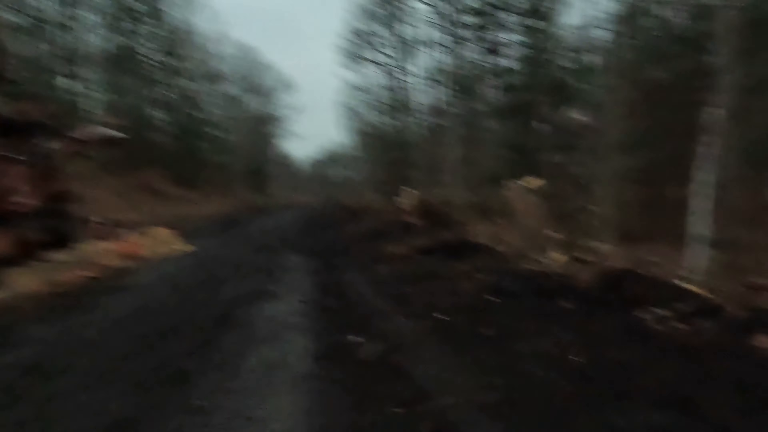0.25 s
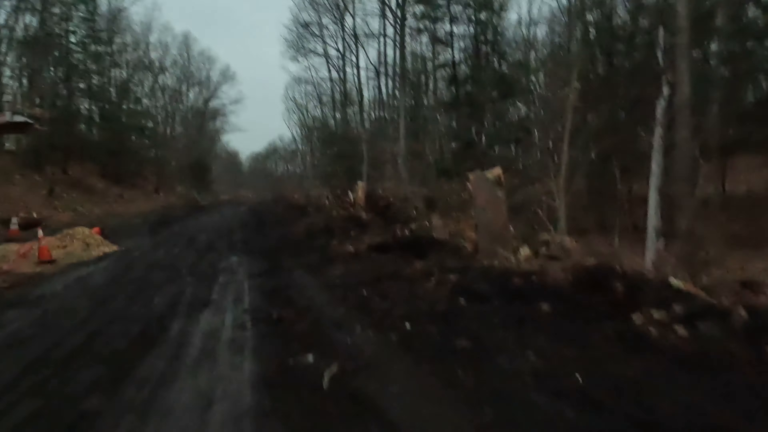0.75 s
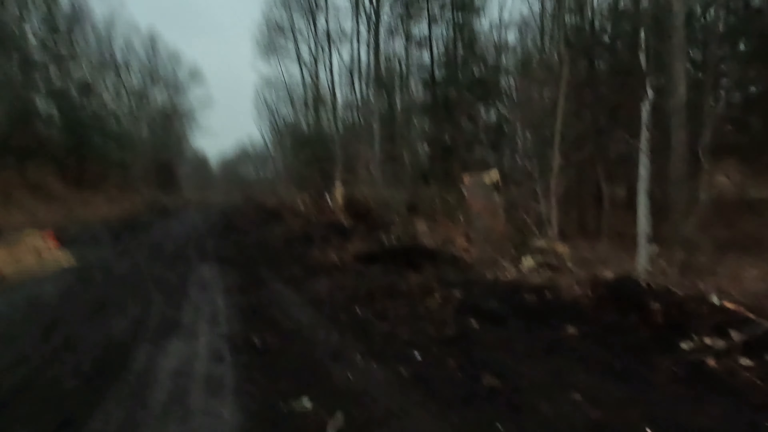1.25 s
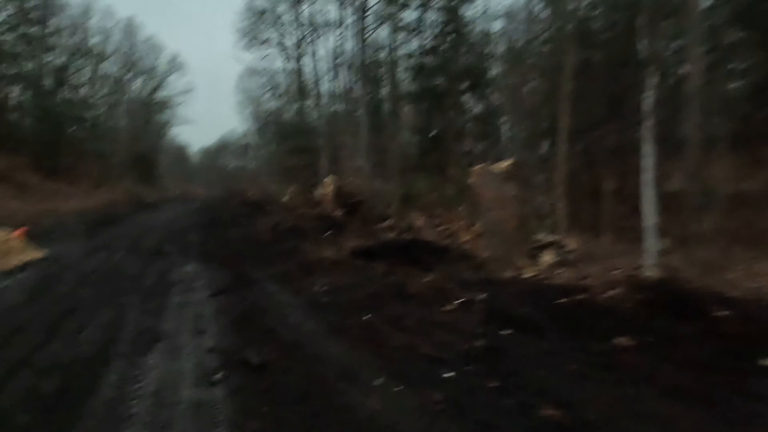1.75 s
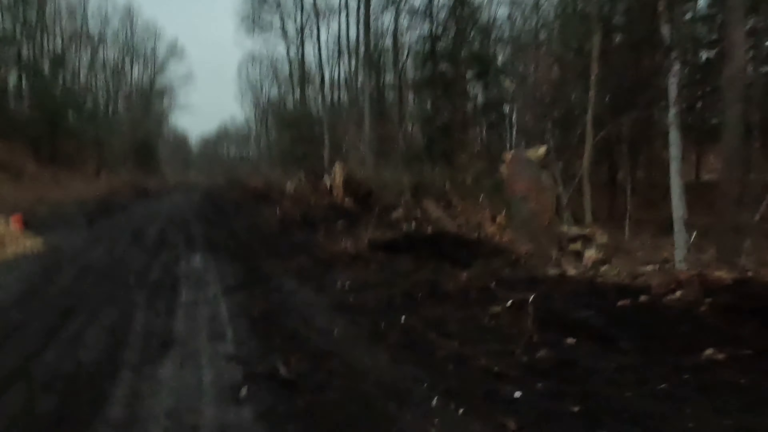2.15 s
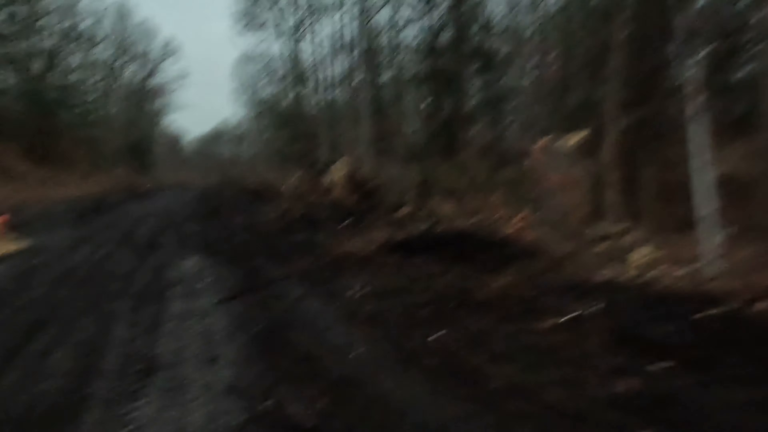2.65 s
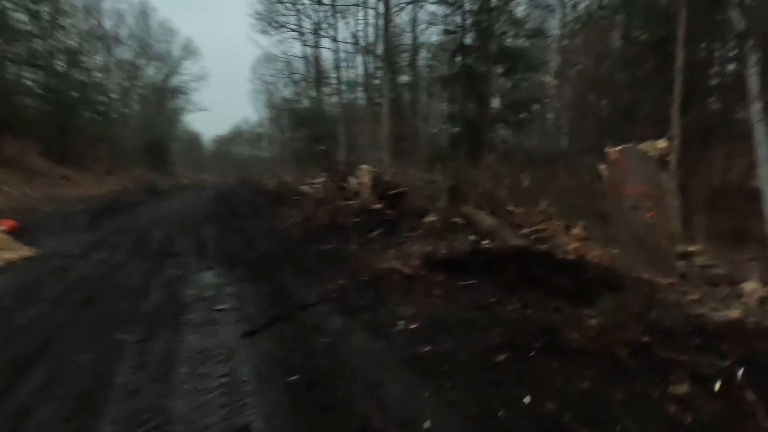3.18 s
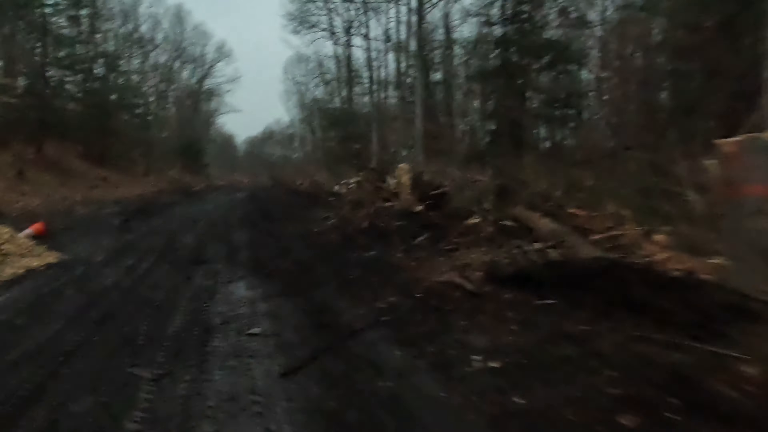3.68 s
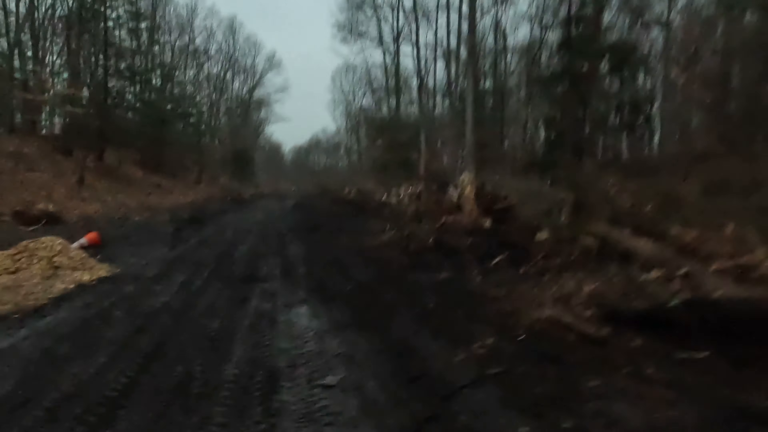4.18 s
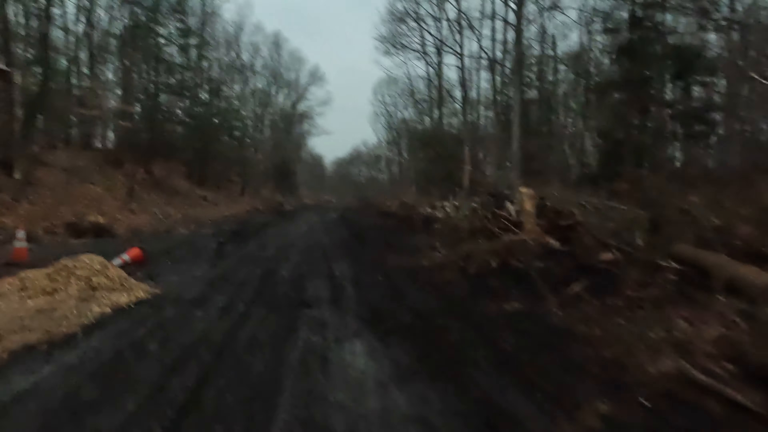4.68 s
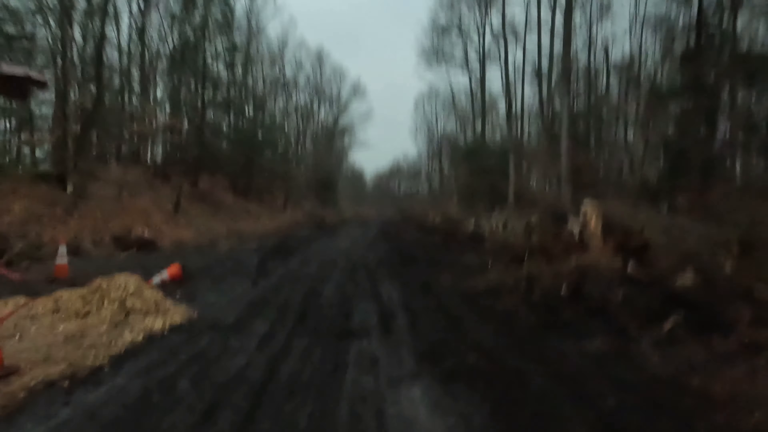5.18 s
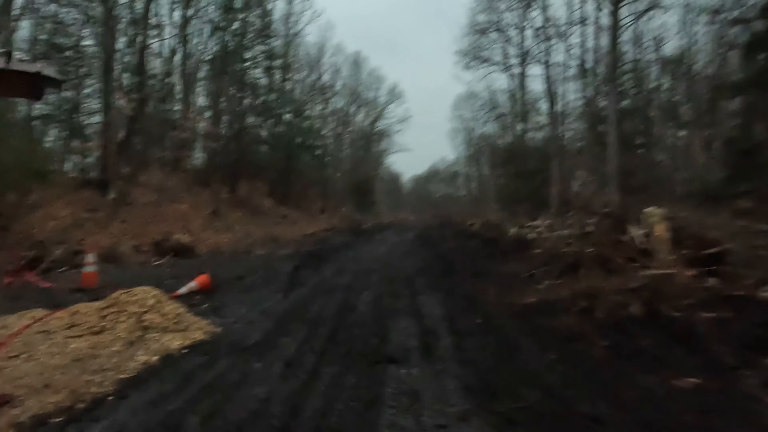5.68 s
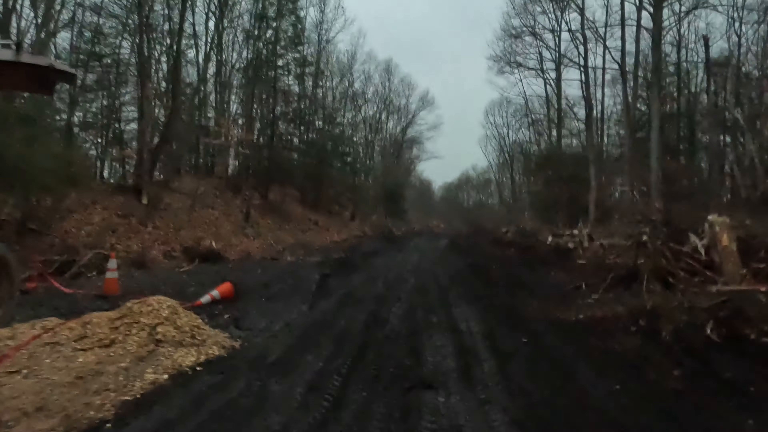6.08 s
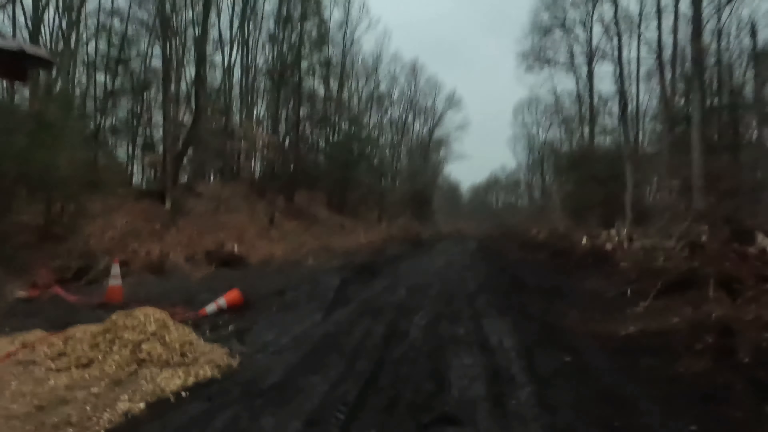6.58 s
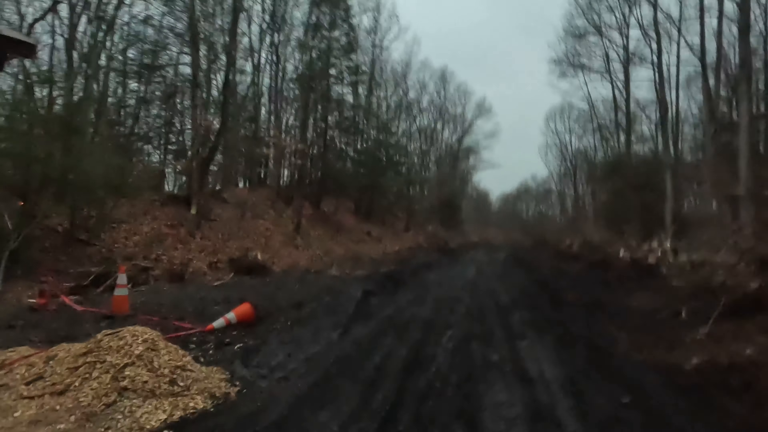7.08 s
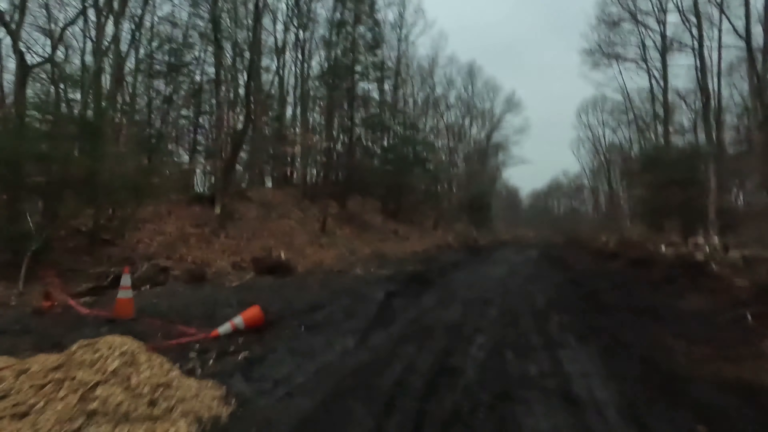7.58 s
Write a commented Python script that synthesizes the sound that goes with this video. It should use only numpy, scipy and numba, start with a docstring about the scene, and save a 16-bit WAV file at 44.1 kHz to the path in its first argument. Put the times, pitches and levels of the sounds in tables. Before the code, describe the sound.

Wet mud underfoot: dull heel thuds, sticky bubbles and small plops, clearest at first, gentler in the middle, strong again near six seconds and bubbly at the end. Wind buffets the handheld microphone in deep gusts, and light rain hisses steadily with bright clicks of drops and grit. A dull wash in the branches fades early. Two bumps jolt the camera late on.

```python
"""A muddy forest track on a wet, windy day, heard from a small camera carried by a walker.
Wind is filtered noise with wandering levels: a rumble and a choppier flutter on the microphone ports.
Drizzle is a noise hiss with sparse clicks; nearer drops and grit are short decaying sine rings.
Boots thud and squelch about twice a second: damped low rings, swarms of bubbles and popping air pockets.
A jet of water whistles in spurts, and twice a knock sets off damped modes of the camera body and hand."""
import sys
import numpy as np
from scipy import signal
from scipy.fft import rfft, irfft, next_fast_len
from scipy.io import wavfile
from scipy.ndimage import uniform_filter1d
from numba import njit

SR = 44100
rng = np.random.default_rng(int(sys.argv[2]) if len(sys.argv) > 2 else 0)


def inscribe(sig):
    """Save sig as 16-bit PCM at rate SR to the path in sys.argv[1].

    A 1-D sig is mono; a 2-D sig holds one channel per row.
    Samples are clipped to [-1, 1] before scaling.
    """
    pcm = np.round(np.clip(np.atleast_2d(sig).T, -1, 1) * 32767)
    wavfile.write(sys.argv[1], SR, pcm.astype(np.int16))


N = 345679
SIZE = next_fast_len(N)  # transform length


def undb(db):
    """Amplitude gain is ten to the power of decibels over twenty."""
    return 10 ** (np.asarray(db) / 20)


def level(x, db):
    """Scale to an rms level, the root of the mean power."""
    return x * undb(db) / np.sqrt(np.mean(x ** 2))


def curves(rows):
    """Linear interpolation turns the columns of a timed table into slow control signals."""
    s, *columns = np.transpose(rows)
    return [np.interp(np.arange(N) / SR, s, column) for column in columns]


def over_hz(points):
    """Read a table of (freq_hz, value) at every frequency bin, interpolating over log frequency."""
    hz, value = np.transpose(points)
    bins_hz = np.fft.rfftfreq(SIZE, 1 / SR)
    return np.interp(np.log(bins_hz + 1), np.log(hz), value)


def colour(x, points):
    """Spectral shaping: multiply the spectrum by a gain curve, then set the rms to 1."""
    spectrum = rfft(x, SIZE) * undb(over_hz(points))
    return level(irfft(spectrum, SIZE)[..., :N], 0)


def walk(rate):
    """Slow random modulation: values held 1 / rate s, smoothed by two moving averages; rms 1."""
    k = int(SR / rate)
    held = np.repeat(rng.standard_normal(N // 100)[:N // k + 1], k)
    smooth = uniform_filter1d(uniform_filter1d(held, k), k)
    return level(smooth[:N], 0)


def pair(likeness):
    """Partial coherence: left and right noise with this correlation, built from mid and side."""
    mid, side = rng.standard_normal((2, N))
    share = np.clip(likeness, 0, 1)
    return np.sqrt(1 + share) * mid + np.sqrt(1 - share) * side * np.array([[1], [-1]])


@njit
def grains(n, rows, glide, rise):
    """Damped oscillators: rows (start, turns a sample, fade in cycles, left, right) swell, glide and die."""
    out = np.zeros((2, n))
    for start, turns, fade, left, right in rows:
        phase, i = 0., int(start)
        while phase < 6 * fade and i < n:
            v = np.sin(2 * np.pi * phase) * np.exp(-phase / fade) * min(phase / rise, 1.)
            out[0, i] += left * v
            out[1, i] += right * v
            phase += min(turns * (1 + glide * phase / fade), .45)
            i += 1
    return out


def ring(s, db, hz, pan_db, cycles, glide, rise=0.11):
    """Impulsively excited resonances: db sets the crest, pan_db is left minus right, rise is in cycles."""
    fade = np.maximum(cycles, .3) / 2  # cycles in which the amplitude falls by a factor e
    crest = np.exp(-rise / fade)  # what the decay leaves once the swell is complete
    left = undb(db + pan_db / 2) / crest
    right = undb(db - pan_db / 2) / crest
    rows = np.array(np.broadcast_arrays(s * SR, hz / SR, fade, left, right))
    return grains(N, np.ascontiguousarray(rows.T), glide, rise)


def wash():
    """Band-limited noise, perhaps wind in the branches: a dull wash that holds, then fades out."""
    # dull noise spectrum: freq_hz, density_db (per Hz)
    wash_spectrum = [(300, -30), (500, 2.5), (750, 0), (1100, 4), (2500, -38)]
    fade_at_s, fade_length_s, wash_db = 1.5, 0.24, -58  # level before the fade
    fade = 1 / (1 + np.exp((np.arange(N) / SR - fade_at_s) / fade_length_s))
    gusty = colour(pair(0.53), wash_spectrum) * undb(4.1 * walk(10.67))
    return level(gusty, wash_db) * fade


def wind():
    """Turbulent pressure at the ports: slow rumble and choppier flutter, both swelling at footfalls."""
    # wind on the ports, before the footfall swell: time_s, rumble_db, flutter_db
    wind_levels = [(0.0, -41, -53.5), (1.07, -41, -52.5), (1.55, -43.5, -55), (1.79, -40, -48.5),
                   (2.82, -39.5, -50.5), (4.08, -42, -54.5), (4.25, -40.5, -50), (5.13, -46, -54),
                   (5.63, -39, -50.5), (6.05, -43.5, -57.5), (6.2, -43.5, -51), (7.42, -44, -49),
                   (7.53, -37.5, -47.5), (7.84, -46, -48.5)]
    # noise spectra of the rumble and the flutter: freq_hz, density_db (per Hz)
    rumble_spectrum = [(12, -4), (28, 2), (45, -2.5), (65, 0), (110, -10), (160, -20.5), (300, -79)]
    flutter_spectrum = [(60, -7), (130, -3), (200, -3), (350, -11.5), (600, -23.5), (1000, -57)]
    # footfalls that swing the camera through the air: time_s, rumble_swell_db
    steps = [(0.22, 8), (0.73, 2), (1.18, 4.5), (1.7, 4), (2.25, 4), (2.7, 1.5), (3.23, 4), (3.7, 5.5),
             (4.22, 2), (4.78, 6.5), (5.15, 6.5), (6.16, 5.5), (6.63, 5)]
    swing_rise_s, swing_fall_s = 0.063, 0.097
    flutter_share = 0.5  # the flutter swells by this share of the dB
    rumble_db, flutter_db = curves(wind_levels)
    t = np.arange(N) / SR
    swing_db = 0
    for s, swell_db in steps:
        width_s = np.where(t < s, swing_rise_s, swing_fall_s)
        swing_db = swing_db + swell_db * np.exp(-((t - s) / width_s) ** 2)
    rumble = level(colour(pair(0.947), rumble_spectrum) * undb(1.5 * walk(8)), 0)
    flutter = level(colour(pair(0.97), flutter_spectrum) * undb(2.3 * walk(25)), 0)
    return undb(rumble_db + swing_db) * rumble + undb(flutter_db + flutter_share * swing_db) * flutter


def drizzle(count=9000):
    """Many random impacts merge into a hiss; stronger ones are faint clicks; octaves waver separately."""
    # drizzle on leaves and ground: freq_hz, density_db (per Hz)
    drizzle_spectrum = [(180, -3), (300, -8.5), (391, -5.5), (562, -9), (821, -9.5), (1020, -4.5),
                        (1300, -2.5), (5570, -5.5), (7500, -11), (8700, -22.5), (10300, -17), (12500, -22),
                        (14000, -28), (15500, -83)]
    # coherence of the two ports: freq_hz, left_right_correlation
    likeness = [(300, 0.65), (800, 0.68), (2400, 0.65), (5000, 0.64), (9000, 0.48), (12000, 0.013)]
    # level difference of the ports: freq_hz, left_minus_right_db
    balance = [(300, -1), (700, 4.5), (1300, 1.5), (2400, 2), (4400, -1), (8100, 1.5), (12000, 3)]
    # phase difference of the ports: freq_hz, left_lead_rad
    lead = [(500, -0.76), (3100, -0.51), (5800, -0.85), (15000, 0.61)]
    drizzle_db = -48
    noise = rng.standard_normal((3, N))
    when, rarity, sign = rng.random((count, 3)).T
    near = np.zeros(N)
    near[(when * N).astype(int)] = undb(-2.6 * np.log(rarity + 0.0033)) * np.sign(sign - .5)
    noise[0] += level(np.diff(near, prepend=0), 1.0)  # differencing: small drops are bright
    both, left, right = rfft(noise, SIZE) * undb(over_hz(drizzle_spectrum))
    shared = np.clip(over_hz(likeness), 0, 1)
    ports = np.sqrt(shared) * both + np.sqrt(1 - shared) * np.array([left, right])
    tilt = undb(over_hz(balance) / 2) * np.exp(.5j * over_hz(lead))  # the ports face different ways
    ports = ports * np.array([tilt, 1 / tilt])
    octave = np.log2(np.fft.rfftfreq(SIZE, 1 / SR) / 250 + 1e-9)  # octaves above 250 Hz
    out, swell_db = 0, 0.058 * walk(6.2)
    for k in range(8):
        band = np.cos(np.pi / 2 * np.clip(octave - k, -1, 1)) ** 2
        waver_db = (0.99 + 0.0082 * k) * walk(24)  # each octave wavers separately by about 1 dB
        out = out + irfft(ports * band, SIZE)[:, :N] * undb(swell_db + waver_db)
    return level(out, drizzle_db)


def patter(count=55):
    """Random impacts: fainter drops and grit fall as short bright rings all along."""
    faint_edge_db = -42  # crest of the weakest
    s, sharp, bright, side = rng.random((count, 4)).T
    hz = 6000 * 2 ** (0.9 * bright)
    pan_db = 4.0 + 8.8 * (side - .5)
    return ring(s * N / SR, faint_edge_db + 7.3 * sharp, hz, pan_db, 2.5, glide=0., rise=0.3)


def ticks():
    """Impact excitation: each near drop or bit of grit gives a sharp edge and a slower-swelling ring."""
    # near drops and grit: start_s, ring_peak_db, ring_hz, edge_peak_db
    tick_rows = [(0.091, -30.5, 4720, -52), (0.625, -35, 4840, -34), (0.672, -35, 4350, -35),
                 (1.0122, -33, 2440, -50), (1.0154, -28, 5360, -50), (1.0765, -34, 5600, -44),
                 (1.1378, -38, 3460, -39), (1.1667, -35, 5180, -45), (1.2097, -35, 5020, -32),
                 (1.2795, -44, 3870, -46), (2.2584, -32, 4080, -42), (2.6815, -33.5, 4470, -49),
                 (3.237, -34, 4500, -42), (3.3548, -31.5, 5200, -33), (3.412, -36, 3200, -36),
                 (3.4912, -30, 6000, -50), (3.7752, -31, 4800, -48), (4.1021, -41, 3880, -46),
                 (4.1445, -33, 4630, -45), (4.2388, -37, 4200, -42), (4.584, -37, 4180, -40),
                 (5.3595, -40, 3800, -42), (5.3924, -33, 4020, -48), (5.7429, -32, 4800, -33),
                 (5.8784, -42, 3000, -49), (6.5725, -29, 5040, -37), (6.782, -37, 3240, -40),
                 (7.1447, -35, 3000, -44)]
    s, db, hz, edge_db = np.transpose(tick_rows)
    edge = ring(s, edge_db, 9500, 3.2, 3.7, glide=0.)
    body = ring(s, db, hz, 1.0, 6.3, glide=0.042, rise=0.58)
    return body - edge  # they push opposite ways, so the band between them fills


def knocks():
    """Modal response to a blow: a tap felt by the capsules, a rattle on the right, body and hand heave."""
    # knocks on the camera body: start_s, tap_left_db, tap_right_db, heave_db, rattle_db
    knock_rows = [(5.5462, -13.5, -27, -9.5, -25), (6.3013, -22, -15, -31, -48)]
    # modes of housing and hand, relative to heave_db: freq_hz, left_db, right_db, t60_s, signed_direction
    modes = [(8.9, -30, -12, 0.6, -0.72), (23.8, -9, -11, 0.3, 0.88), (38, -23, -4, 0.15, 0.69),
             (79, 1.5, -9, 0.07, 0.89), (143, -14, -8, 0.07, 0.79)]
    # rattle grains, relative to rattle_db: after_tap_s, freq_hz, peak_db
    rattle = [(-.003, 1250, -6), (-.0025, 6400, -4), (0., 1150, -2), (0., 3130, 2), (.01, 1050, -8)]
    # delay of the heave, left then right, as the blow lands nearer the right capsule: lag_s
    heave_lag = [
        [0.003],
        [0.0016],
    ]
    tap_hz, tap_t60_s = 146, 0.012
    out, t = np.zeros((2, N)), np.arange(SR // 2) / SR
    tap = -np.sin(2 * np.pi * tap_hz * t) * undb(-60 * t / tap_t60_s) * np.clip(t / 0.0015, 0, 1)
    late = np.maximum(t - np.array(heave_lag), 0)
    heave = 0
    for hz, left_db, right_db, t60_s, way in modes:
        decay = undb(-60 * late / t60_s)
        heave = heave + way * undb([[left_db], [right_db]]) * np.sin(2 * np.pi * hz * late) * decay
    after, hz, db = np.transpose(rattle)
    for s, left_db, right_db, heave_db, rattle_db in knock_rows:
        i = int(s * SR)
        out[:, i:i + len(t)] += undb([[left_db], [right_db]]) * tap + undb(heave_db) * heave
        out += ring(s + after, db + rattle_db, hz, -10.0, 2.0, glide=0., rise=0.18)
    return out


def squirt():
    """Jet tone: water squeezed out whistles in spurts that swell for a few cycles and ring at its pitch."""
    # spurts of the jet: start_s, peak_db, pitch_hz
    spurts = [(5.0958, -39, 5300), (5.105, -39, 5700), (5.1115, -30, 6000), (5.1145, -30, 5700),
              (5.1135, -37, 3900), (5.12, -35, 5950), (5.117, -36, 4140)]
    s, db, hz = np.transpose(spurts)
    return ring(s, db, hz, 2.5, 16.0, glide=0.003, rise=5)


def mud(count=2600):
    """Bubble resonance: crackling bursts free dull to bright bubbles, as strong as the squelch at hand."""
    # a boot sinking in or pulling free: start_s, length_s, level_db, brightness_db (from dull to bright)
    squelches = [(0.189, 0.11, -56.5, 0), (0.444, 0.071, -62, -8), (0.688, 0.077, -55.5, -2),
                 (0.898, 0.061, -62, 3), (1, 0.029, -54, 0.5), (1.154, 0.05, -58, 2),
                 (1.266, 0.045, -57, -1), (2.245, 0.099, -62, -4), (2.706, 0.048, -58, 0.5),
                 (3.207, 0.13, -60, -3), (3.446, 0.045, -55, -3.5), (3.674, 0.12, -58.5, 0),
                 (4.123, 0.26, -62, -2), (4.394, 0.045, -57, -2), (5.078, 0.063, -60.5, 6),
                 (5.123, 0.093, -57.5, -1), (5.581, 0.058, -57, -1), (6.118, 0.044, -49.5, -3),
                 (6.169, 0.065, -57, -3.5), (6.569, 0.066, -57, 1.5), (7.13, 0.09, -59, -1),
                 (7.245, 0.15, -59.5, 0), (7.49, 0.17, -59, 3.5)]
    # bubble kinds, dull to bright: lowest_hz, spread_octaves, cycles, left_minus_right_db, offset_db
    bubbles = [(326, 2.19, 3.7, 1.5, 2), (913, 1.06, 9.2, 4.5, 3), (1992, 1.895, 8.2, 5, 4.5)]
    out, t = 0, np.arange(N) / SR
    s, size, side = rng.random((count, 3)).T
    s, burst_db, side = s * N / SR, 6.0 * size, side - .5
    for k, (lowest_hz, octaves, cycles, pan_db, kind_db) in enumerate(bubbles):
        swarm = 0
        for _ in range(2 + k):  # bubbles of this kind in a burst
            late, pitch, own = rng.random((count, 3)).T
            hz = lowest_hz * 2 ** (octaves * pitch)
            swarm = swarm + ring(s + .008 * late, burst_db + 10.0 * own, hz, pan_db + 17.0 * side,
                                 cycles, glide=0.11, rise=0.46)
        effort = np.zeros(N)
        for start, length, squelch_db, bright_db in squelches:
            x = np.clip((t - start) / length, -.2, 1.3)  # the slopes overhang both ends
            slopes = np.minimum((x + .2) / 0.54, (1.3 - x) / .5)
            effort += undb(squelch_db + kind_db + (k - 1) * bright_db) * np.clip(slopes, 0, 1)
        out = out + effort * level(swarm, 0)
    return out


def pops():
    """Cavity resonance: the film over an air pocket tears, then the pocket rings at its own pitch."""
    # air pockets popping in the mud: start_s, peak_db, pitch_hz
    pockets = [(0.191, -37, 290), (0.215, -43, 926), (0.264, -31, 268), (0.431, -32.5, 426),
               (0.458, -45, 1320), (0.486, -43, 1300), (0.494, -39, 2250), (0.714, -32, 555),
               (0.734, -33, 450), (0.753, -31.5, 365), (0.902, -34.5, 343), (1.0142, -34.5, 1400),
               (1.166, -36, 356), (1.185, -34, 250), (1.185, -35, 1840), (1.279, -40, 960),
               (1.301, -36, 950), (1.324, -36, 1030), (1.492, -38, 1580), (1.822, -39, 1510),
               (2.257, -41, 1053), (2.298, -42, 1100), (2.33, -42, 1000), (2.724, -39.5, 1330),
               (2.821, -40, 1650), (3.252, -38, 342), (3.296, -40, 317), (3.444, -41, 600),
               (3.444, -41, 2160), (3.459, -39, 620), (3.466, -42, 1730), (3.466, -40, 420),
               (3.475, -39, 380), (3.482, -35, 414), (3.605, -39, 2240), (3.708, -39, 324),
               (3.708, -36.5, 1060), (4.259, -41.5, 1130), (4.393, -38, 1210), (4.759, -39, 1350),
               (5.177, -36, 1160), (5.187, -31.5, 1460), (5.877, -36, 960), (6.111, -32, 307),
               (6.131, -36, 1070), (6.156, -36, 306), (6.156, -41, 1140), (6.181, -38, 1200),
               (6.22, -39, 1070), (6.297, -35.5, 705), (6.49, -37.5, 1140), (6.863, -40, 1600),
               (7.088, -37, 1820), (7.103, -37, 1690), (7.116, -36, 1240), (7.126, -35, 1250),
               (7.144, -39, 2150), (7.173, -39, 1180), (7.19, -38, 1660), (7.195, -38, 1160),
               (7.267, -33, 360), (7.342, -36.5, 500), (7.546, -43, 1180), (7.58, -46, 1890),
               (7.614, -41, 1160), (7.74, -31, 554), (7.744, -29.5, 320)]
    s, db, hz = np.transpose(pockets)
    pan_db = 1.5 + 2.5 * np.log2(hz / 300)  # high pops lean further left
    small = hz > 800  # small pockets swell more gently and ring for more cycles
    large_db, small_db = np.where(small, -120, db), np.where(small, db, -120)  # -120 mutes
    large_cycles, small_cycles = 1.73 * (hz / 300) ** 0.39, 4.1 * (hz / 1200)
    out = ring(s + 0.00177, large_db, hz, pan_db, large_cycles, glide=0.0045, rise=0.12)
    out += ring(s + 0.00073, small_db, hz, pan_db, small_cycles, glide=0.0037, rise=0.54)
    film = ring(s, db - 22.0, 2.48 * hz, pan_db, 15.6, glide=0.081)
    return out + film


def thuds():
    """Heavily damped impact: heels and soles land with low rings that die in about a cycle, gliding down."""
    # heels and soles landing: start_s, peak_db, pitch_hz
    landings = [(0.191, -28.5, 95), (0.27, -27.5, 137), (0.708, -30, 177), (1.167, -26, 150),
                (1.792, -31.5, 117), (1.842, -28.5, 110), (2.984, -26.5, 71), (3.209, -26, 61.5),
                (3.292, -32, 121), (3.31, -27.5, 72), (3.605, -29, 121), (3.679, -28.5, 150),
                (3.69, -30, 110), (3.775, -30, 98), (6.155, -23, 141)]
    s, db, hz = np.transpose(landings)
    return ring(s + 0.00412, db, hz, 0, 1.14, glide=-0.058, rise=0.38)


def scene():
    """Superposition of weather, camera and boots; the ports filter everything but wind, wash and drizzle."""
    clicks = patter() + ticks() + knocks() + squirt() + mud() + pops() + thuds()
    # the ports lose 0.15 of a click in a narrow dip at 9400 Hz
    clicks = clicks - 0.15 * signal.lfilter(*signal.iirpeak(9400, 3.0, fs=SR), clicks)
    # clicks reach the capsules dulled above 13200 Hz
    clicks = signal.sosfilt(signal.butter(4, 13200, fs=SR, output="sos"), clicks)
    return wash() + wind() + drizzle() + clicks


def record(dry):
    """Band limiting: the camera cuts the top with a steep low-pass filter."""
    top_hz = 15500
    return signal.sosfilt(signal.ellip(10, .2, 80, top_hz, fs=SR, output="sos"), dry)


dry = scene()
out = record(dry)
inscribe(out)
```